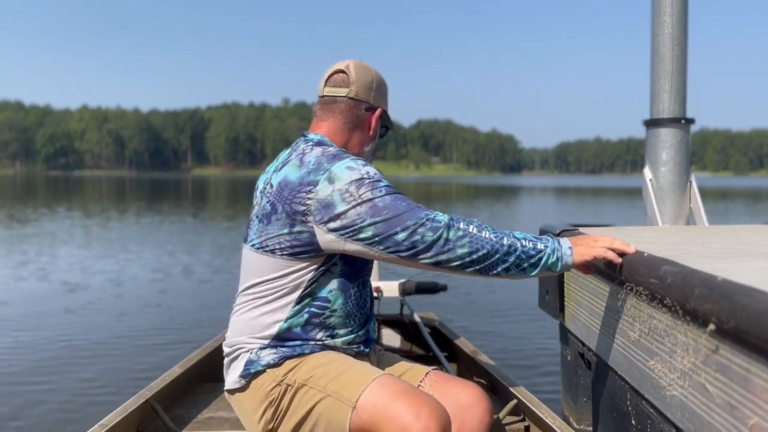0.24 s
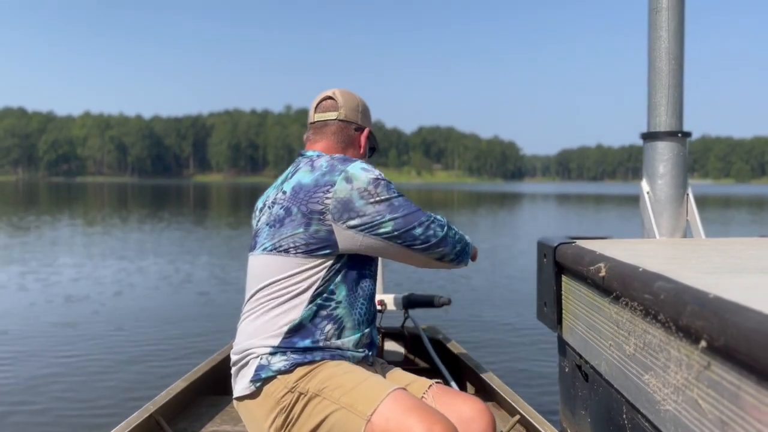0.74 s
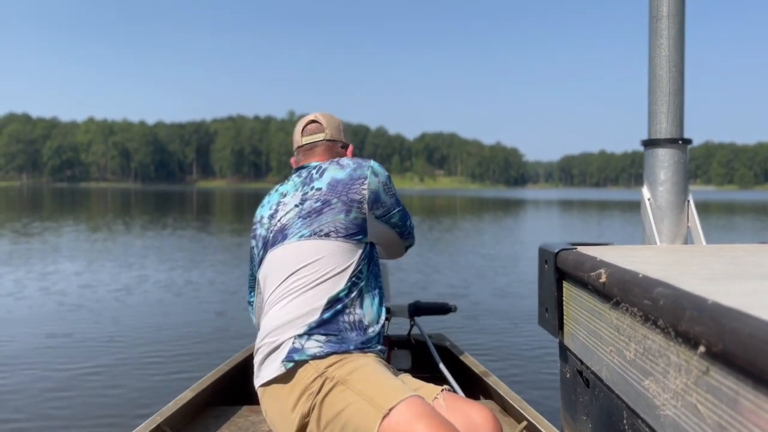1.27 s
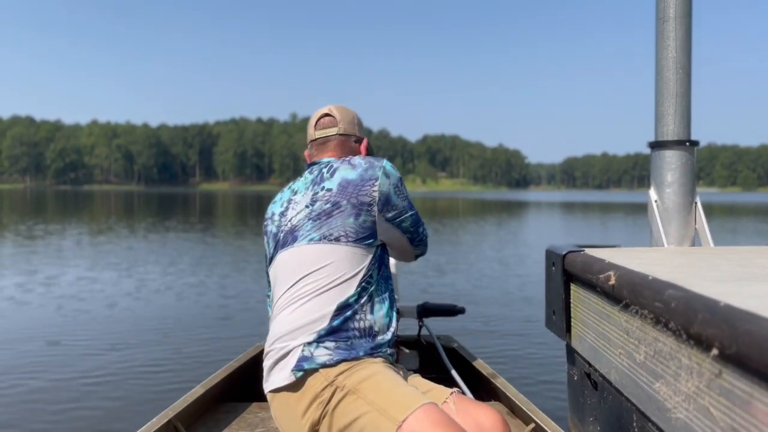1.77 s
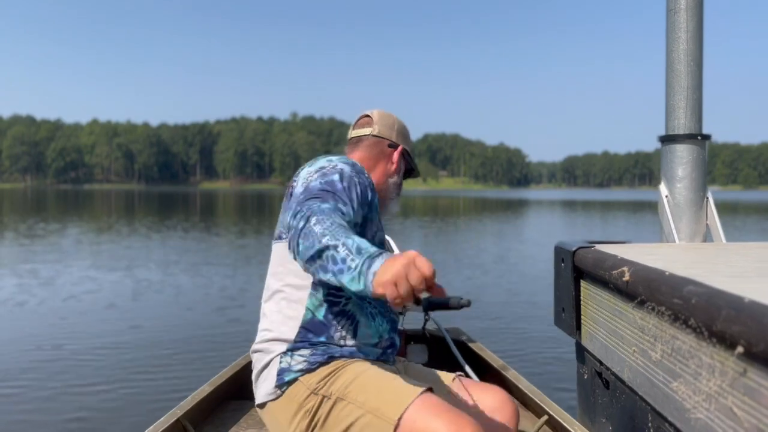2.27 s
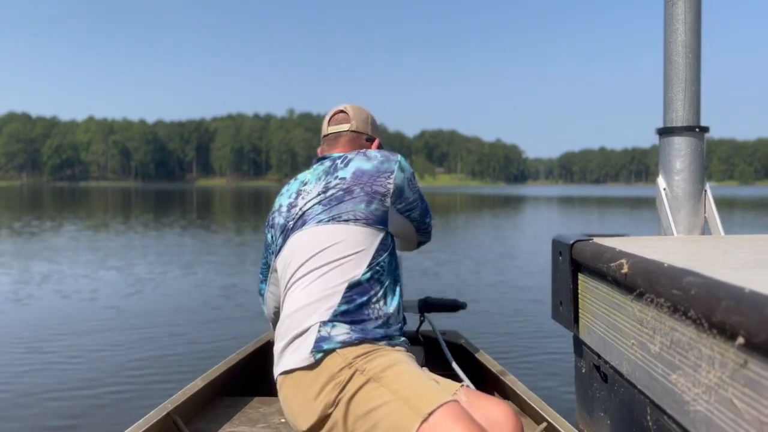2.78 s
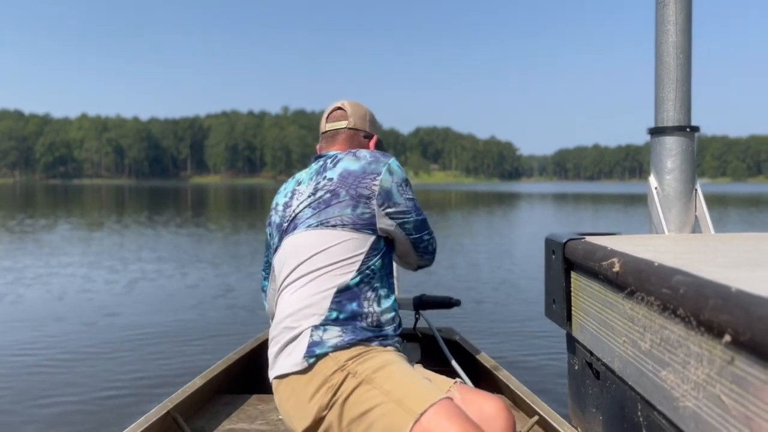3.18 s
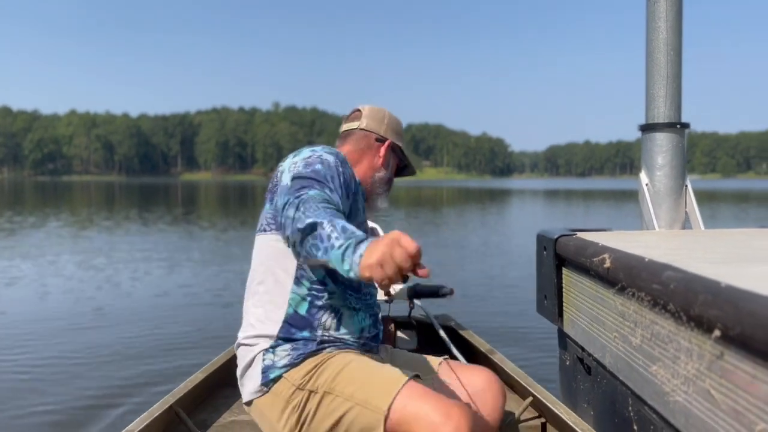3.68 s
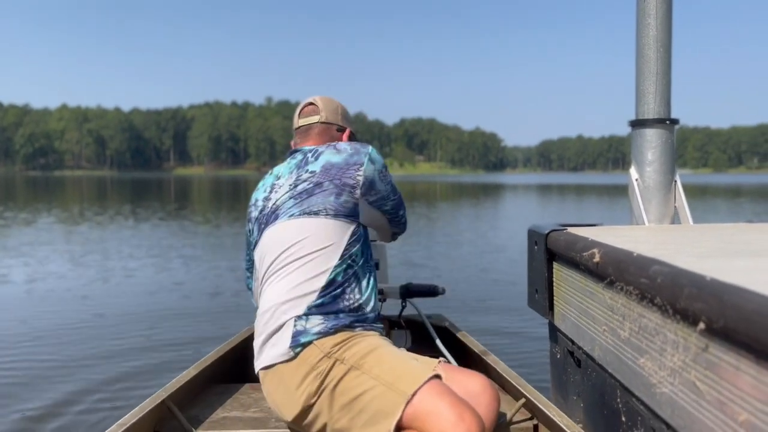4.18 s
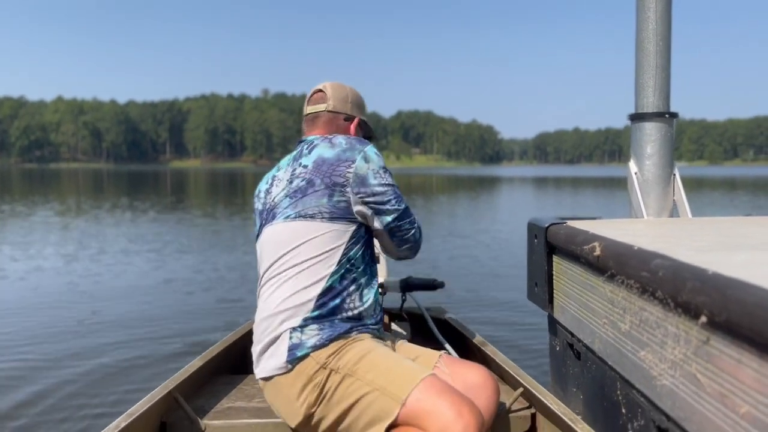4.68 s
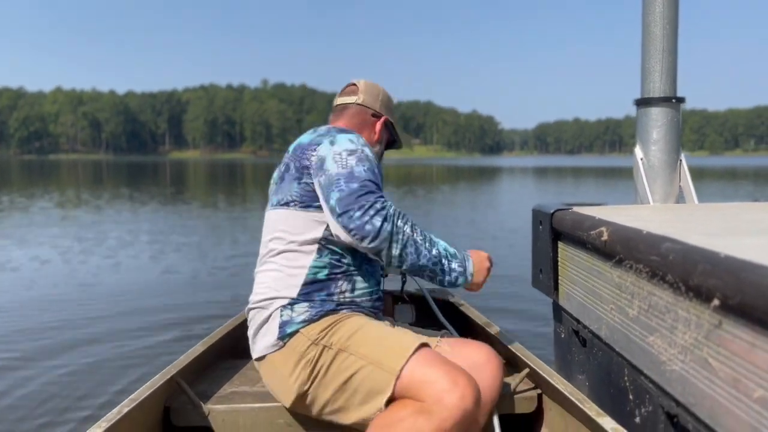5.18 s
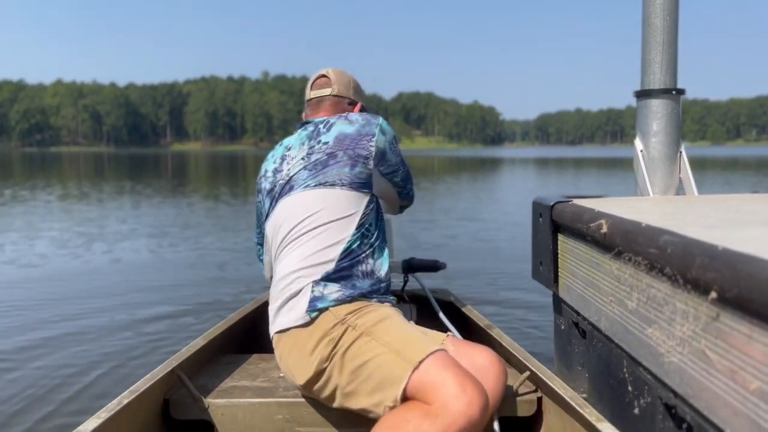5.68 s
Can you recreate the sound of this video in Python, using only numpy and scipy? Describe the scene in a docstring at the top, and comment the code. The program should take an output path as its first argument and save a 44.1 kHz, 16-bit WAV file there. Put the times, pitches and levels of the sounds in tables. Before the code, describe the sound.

On a quiet lake, a small metal boat gives a few soft, hollow bumps as someone shifts in it. Then an outboard motor's starter cord is yanked three times. Each pull brings a brief cord hiss, sharp clacks, a rattling cover and a low drumming through the hull, then dies without the engine starting. One last knock follows, heard in stereo from inside the boat.

```python
"""A quiet lake hisses and faint, high ticks sound. A man shifts in a small aluminium boat, rocking it.
Near 2, 3.4 and 4.8 s he yanks the starter cord of an outboard motor. Each time the cord hisses out,
the turning engine makes the hull drum, and the handle and pawls (the starter's catches) clack on its cover.
After each pull the engine dies; a last knock comes near 5.9 s. A phone in the bow hears it in stereo."""
import sys
import numpy as np
from scipy import signal
from scipy.fft import rfft, irfft
from scipy.io import wavfile
from scipy.ndimage import uniform_filter1d

SR = 44100
rng = np.random.default_rng(int(sys.argv[2]) if len(sys.argv) > 2 else 0)


def wav_out(sig):
    """Save sig, one row per channel (or a flat mono array), as 16-bit PCM at SR to the path in sys.argv[1]."""
    wavfile.write(sys.argv[1], SR, np.round(np.clip(np.atleast_2d(sig).T, -1, 1) * 32767).astype(np.int16))


N = 262218
TIME = np.arange(N) / SR

# Pulls on the cord: (engine starts turning [s], cord runs out [s], strength [dB])
PULLS = [(1.967, 2.12, -2), (3.398, 3.497, 0.5), (4.773, 4.928, -4)]
def pull_level(rest_db, level, rise, delay, hold, fall, blows=(), wake_db=0, wake_fall=0):
    """Loudness in dB of rocking, pulls and fading blows together. Times are in s, slopes in dB/s."""
    power = undb(rest_db) ** 2
    for start, end, strength_db in PULLS:
        power += swell(start + delay, end + hold, level + strength_db, rise, fall)
    for start, blow_db in blows:
        power += (TIME > start) * swell(start, start, blow_db + wake_db, 0, wake_fall)
    return 10 * np.log10(power)


# Notes the hull's panels ring at: (pitch [Hz], width [Hz], level [dB])
HULL_NOTES = [(161.8, 25, 0), (127.7, 15.6, -6), (211.2, 34, -9), (258.3, 27.3, -10)]
# The hull's deep boom: (pitch [Hz], width [Hz], level [dB])
BOOM_NOTES = [(52, 31.5, -0.5), (73, 25.8, 5), (110.8, 11.6, 5), (215.2, 44.4, -4.5), (293, 250, -14.5)]
def hull_shake(rest_db):
    """Uneven jolts from the turning engine make the thin metal hull drum."""
    blows = [(start, db) for start, db, _, _ in THUMPS]
    deep_blows = [(start, db + boom_db) for start, db, boom_db, _ in THUMPS]
    drum_db = pull_level(rest_db, level=-33, rise=92, delay=-0.04, hold=0.18, fall=55,
                         blows=blows, wake_db=-14, wake_fall=92)
    boom_db = pull_level(rest_db, level=-35, rise=160, delay=0.08, hold=0.1341, fall=26.5,
                         blows=deep_blows, wake_db=-5.5, wake_fall=121)
    rubber_mounts = signal.butter(2, 320, fs=SR)  # they soften each jolt
    push = signal.lfilter(*rubber_mounts, jolts(rate=220, scatter_db=1.5))
    push *= undb(2.2 * wander(22))  # the crank strains and lets go
    return undb(drum_db) * unit(ring(push, HULL_NOTES)) + undb(boom_db) * unit(ring(push, BOOM_NOTES))


# Blows on the hull: (time [s], level [dB], boom against the note [dB], shove length [ms])
THUMPS = [(0.123, -52, 2.5, 8.3), (0.175, -61.5, 13.5, 15), (0.838, -34, 5, 6.1), (0.854, -43, -15, 6.7),
          (1.1, -33, 3.5, 4), (1.135, -32.5, -2, 3.8), (1.257, -39, -23, 8.7), (1.41, -25, -32, 8.8),
          (1.523, -46, -30, 48), (1.867, -34.5, -9, 11), (1.89, -31.5, -12, 11), (1.995, -29.5, -7, 15),
          (2.013, -24, -5, 17), (2.042, -17.5, -4, 4.7), (2.153, -17.5, -8, 12.3), (2.262, -22, -37, 16),
          (2.305, -25.5, -16, 16), (2.35, -27, -5, 10), (2.738, -27.5, -10, 39), (2.894, -34, -19, 7.4),
          (2.925, -36.5, -22, 14), (3.043, -23.5, -24, 12.3), (3.327, -36, -34, 5.9),
          (3.41, -32.5, -16, 6.8), (3.497, -23, -25, 21), (3.527, -19.5, -26, 36), (3.574, -21, -28, 26),
          (3.628, -21, -33, 19), (3.659, -25.5, -12, 12), (3.834, -27, -32, 16), (4.059, -32, -31, 20),
          (4.17, -31.5, -38, 48), (4.495, -22, -43, 16), (4.664, -30, -32, 9.4), (4.775, -23, -10, 17),
          (4.806, -21, -10, 12), (4.833, -31, -4, 7.8), (4.869, -28, -16, 17), (4.923, -23, -2.5, 68),
          (4.958, -25.5, -2, 8.6), (5.013, -32, -10, 8.4), (5.024, -22.5, -29, 12.6), (5.055, -32, -18, 18),
          (5.128, -28.5, -13, 25), (5.16, -35, -24, 17), (5.224, -32, 0, 15), (5.306, -42, 7.5, 10),
          (5.489, -47, 6.5, 27), (5.903, -22, -23, 14)]
def hull_thumps():
    """Each blow shakes the hull at its main pitch, so a longer shove swells the note."""
    out, t = np.zeros((2, N)), np.arange(int(0.5 * SR)) / SR
    tap = np.sin(np.pi * np.clip(t / 0.0025, 0, 1))
    boom = ring(tap, BOOM_NOTES)
    boom /= np.abs(boom).max()
    for start, db, boom_db, shove_ms in THUMPS:
        shove = np.sin(np.pi * np.clip(t / (shove_ms / 1000), 0, 1))
        note = ring(shove * np.sin(2 * np.pi * HULL_NOTES[0][0] * t), HULL_NOTES)
        note /= np.abs(note).max()
        add(out[0], start - 0.004, undb(db) * (note + undb(boom_db) * boom))
    return out


# Notes of the boat's back wall, where the motor hangs: (pitch [Hz], width [Hz], level [dB])
BACK_WALL_NOTES = [(247, 70, 0.5), (434, 113, 1.5), (633, 99, -1.5), (761, 210, -6)]
# Lower notes of the engine cover: (pitch [Hz], width [Hz], level [dB])
COVER_NOTES = [(891, 28, 1.5), (971.4, 39, 0.5), (1117, 115, 0), (1335, 230, -3), (1546, 297, -6.5)]
# Higher notes of the cover: (pitch [Hz], width [Hz], level [dB])
COVER_HIGH_NOTES = [(1770, 52, 3), (1964, 43, 5.5), (2020, 51, 5.5), (2379, 54, 4.5), (2617, 52, 3),
                    (2810, 27, 3.5), (3044, 90, 1.5), (3337, 51, 1.5), (3430, 65, 1.5), (3850, 38, -5)]
def engine(rest_db):
    """The flywheel churns through the back wall while loose parts rattle in the cover."""
    blows = [(start, db + hollow_db) for start, db, _, hollow_db, _ in CLACKS]
    churn_db = pull_level(rest_db + 2.5, level=-41.5, rise=105, delay=0.07, hold=0.22, fall=89,
                          blows=blows, wake_db=-14.5, wake_fall=150)
    rattle_db = pull_level(rest_db, level=-47.5, rise=87, delay=0.57, hold=0.3252, fall=95)
    push = jolts(rate=700, scatter_db=3.5) * undb(3.5 * wander(25) + 1.5 * wander(80))
    # now and then a part hits one spot, so one note stands out
    lone_notes = COVER_NOTES[1:] + COVER_HIGH_NOTES[2:5]
    clink = sum(ring(jolts(rate=90, scatter_db=2), [note]) for note in lone_notes)
    rattle = unit(ring(push, COVER_NOTES)) + undb(-8) * unit(ring(push, COVER_HIGH_NOTES))
    rattle += undb(-7.5) * unit(clink)
    return undb(churn_db) * unit(ring(push, BACK_WALL_NOTES)) + undb(rattle_db) * rattle


# Notes of a pawl: (pitch [Hz], width [Hz], level [dB])
PAWL_NOTES = [(4120, 23, 9.5), (4500, 520, 6.5), (5130, 200, 7.5), (5860, 510, 2.5), (8080, 1140, -0.5),
              (9800, 1600, -22)]
# Pawls, handle and fittings hit: (time [s], level [dB], treble [dB], hollow part [dB], rattle time [ms])
CLACKS = [(0.621, -61.5, 5.5, -11, 4), (0.824, -50, -22, 8.5, 12), (0.828, -55, -19, 14, 68),
          (0.874, -46, -32, 2.5, 93), (1.026, -60.5, 5, -10, 4.4), (1.083, -47, -20, -5, 10),
          (1.084, -41.5, -27, 6, 68), (1.122, -56, -25, 13, 72), (1.12, -61, 7, -10, 7),
          (1.231, -51, 3.5, 3, 10), (1.331, -59.5, 6.5, -10, 8), (1.388, -35.5, -25, -1, 24),
          (1.859, -40, -33, 5.5, 90), (1.923, -35, 3.5, 0.5, 5.2), (2.022, -28, -9, -1.5, 5.1),
          (2.133, -18, -2.5, -8, 24), (2.241, -37.5, -2, 7, 7.4), (2.329, -48, 3, 7, 20),
          (2.452, -45, -8, -7, 16), (2.696, -52, 0, -14, 14), (2.722, -31.5, 0, -13.5, 16),
          (2.854, -47.5, -7.5, -26, 5), (2.904, -46, -6, -0.5, 25), (3.032, -35.5, -10, 2.5, 14.7),
          (3.192, -44.5, -31, 1.5, 44), (3.521, -28, -16, -3, 4.5), (3.555, -20, -2, -15, 29.6),
          (3.65, -44, 2, -10, 4.5), (3.663, -30, -5, 2.5, 21), (3.679, -35, -20, 12, 8.9),
          (3.74, -33, -31, -2, 27), (3.769, -45.5, 1, -3, 52), (3.836, -47, -9, 15, 17),
          (3.89, -37.5, -16, -3.5, 30), (4.42, -47.5, -7.5, -24, 86), (4.481, -32.5, -8.5, -2, 16),
          (4.745, -35, -7.5, -19, 91), (4.774, -34, -38, 7.5, 30), (4.848, -30, -26, -16, 50),
          (4.877, -38, -12, -23, 5.4), (4.916, -16.5, -4.5, -9, 25.6), (5.008, -41.5, 3, 9, 6.5),
          (5.082, -40, -2.5, -21, 20), (5.156, -47.5, 4, -11, 10), (5.24, -44.5, -8, -7, 41),
          (5.284, -52.5, -0.5, -6, 95), (5.797, -45.5, -5, -0.5, 26), (5.884, -30.5, -12.5, 4.5, 16.2)]
def clacks():
    """Each clack is a burst of tiny hits: a bright crack, then the cover and back wall ring."""
    out, t = np.zeros((2, N)), np.arange(int(0.2 * SR)) / SR
    damping = 1.8  # parts stay touching, which shortens the ring
    tail = 0.26 * np.exp(-t / 0.025)
    spots = rng.standard_normal((len(CLACKS), 2, 16))
    for (start, db, treble_db, hollow_db, rattle_ms), spot in zip(CLACKS, spots):
        rattle_s = rattle_ms / 1000
        swell_s = 0.012 * undb(0.2 * treble_db)  # dull knocks swell faster
        noise, roughness = rng.standard_normal((2, 2, len(t)))
        hits = noise * undb(4.3 * roughness)
        body = hits * (1 - np.exp(-t / swell_s)) * (np.exp(-(t / rattle_s) ** 2) + tail)
        crack = hits * np.clip(t / 0.000077, 0, 1) * (np.exp(-(t / (0.87 * rattle_s)) ** 1.32) + tail)
        tick = crack * (0.72 + 0.36 * np.exp(-t / 0.014))
        parts = [(body, COVER_NOTES, -3.5), (body, BACK_WALL_NOTES, hollow_db),
                 (crack, COVER_HIGH_NOTES, treble_db), (tick, PAWL_NOTES, treble_db - 1.5)]
        for push, notes, part_db in parts:
            # each blow lands somewhere new, so the notes shift in pitch and strength
            struck = [(hz * (1 + 0.012 * detune), width * damping, note_db + 2.5 * boost)
                      for (hz, width, note_db), detune, boost in zip(notes, *spot)]
            sound = ring(push, struck)
            add(out, start, undb(db + part_db) * sound / np.abs(sound[0]).max())
    return out


# Loose parts hit one spot: (loudest moment [s], pitch [Hz], level [dB], rough length [ms])
CLINKS = [(0.765, 417, -55, 24), (0.795, 350, -55, 26), (0.847, 301, -34, 17.2), (0.875, 328, -50, 23),
          (0.895, 1195, -50, 34), (0.919, 1120, -52, 23), (0.948, 1256, -60, 44), (1.104, 350, -46, 17.6),
          (1.11, 910, -52, 43), (1.137, 302, -43, 18), (1.234, 1294, -53, 12), (1.396, 990, -34.5, 14),
          (1.87, 865, -47.5, 36), (1.927, 1120, -36, 19), (2.011, 440, -34, 18.4), (2.025, 906, -29.5, 12),
          (2.044, 451, -34, 23.4), (2.145, 1004, -19, 11), (2.161, 430, -37, 28), (2.243, 2310, -39.5, 12),
          (2.352, 1760, -51, 13.6), (2.458, 947, -42.5, 16), (2.559, 1230, -62, 25), (2.729, 2110, -33, 12),
          (2.861, 1990, -52, 16), (2.862, 2440, -54, 11), (2.864, 1050, -52, 11), (2.919, 1020, -53, 35),
          (2.957, 1070, -58, 32), (2.985, 1950, -62, 36), (2.992, 960, -57, 24), (3.041, 1044, -41, 11),
          (3.048, 398, -42, 15), (3.209, 934, -49, 40), (3.228, 1490, -57, 26), (3.25, 726, -48, 32),
          (3.385, 930, -43, 20), (3.389, 1220, -56, 15), (3.567, 1010, -28, 16), (3.573, 1497, -25, 12.6),
          (3.675, 1173, -37.5, 24), (3.677, 229, -29, 17), (3.687, 200, -20.5, 12.4),
          (3.712, 1150, -39, 19), (3.744, 2360, -53, 33), (3.751, 990, -35.5, 11), (3.897, 965, -42.5, 60),
          (3.911, 2400, -55, 29), (3.979, 950, -53, 46), (3.997, 1350, -55, 24), (4.128, 1000, -60, 14),
          (4.253, 2000, -64, 16), (4.433, 1000, -49.5, 11), (4.452, 1000, -61, 17), (4.453, 2530, -62, 16),
          (4.492, 965, -38.5, 16), (4.642, 927, -55, 29), (4.748, 1130, -47, 17), (4.781, 1380, -39.5, 18),
          (4.883, 1110, -35.5, 20), (4.929, 1071, -19.5, 16), (4.936, 2550, -33, 28),
          (5.083, 2330, -44, 15), (5.09, 1120, -42, 35), (5.128, 945, -47, 14), (5.162, 1800, -58, 26),
          (5.245, 950, -41, 10.6), (5.274, 2040, -53, 47), (5.285, 970, -44.5, 10.3), (5.301, 965, -50, 10),
          (5.479, 1060, -55, 12), (5.811, 924, -46.5, 11.7), (5.899, 500, -46, 13), (5.901, 894, -35, 23.5)]
def clinks():
    """A struck part rings on one wavering note that swells fast and fades more slowly."""
    out = np.zeros((2, N))
    for (peak_time, hz, db, length_ms), offset in zip(CLINKS, rng.random((len(CLINKS), 2))):
        rise_s = 0.3 * length_ms / 1000
        t = np.arange(int(8 * rise_s * SR)) / SR
        waver = 14 * uniform_filter1d(rng.standard_normal(len(t)), size=200)
        cycles = np.cumsum(hz * (1 + 0.012 * waver)) / SR + offset[:, None]
        shape = (t / rise_s * np.exp(1 - t / rise_s)) ** 2
        add(out, peak_time - rise_s, undb(db) * shape * np.sin(2 * np.pi * cycles))
    return out


# Metallic snaps: (time [s], level [dB], fade time [ms])
SNAPS = [(1.9227, -26, 9.2), (2.1325, -38, 6), (3.5569, -31, 10), (3.6236, -39, 7.8), (3.6674, -37, 7),
         (4.8599, -41, 8), (4.9163, -35, 6), (5.2967, -47, 7.1)]
# Tone of a snap: (frequency [Hz], level [dB])
SNAP_TONE = [(3000, -12), (5000, 4), (8000, 2.5), (12000, -2), (15700, -3)]
def pawl_snaps():
    """A pawl bites or lets go with a sudden, bright crackle."""
    out, t = np.zeros((2, N)), np.arange(int(0.08 * SR)) / SR
    for start, db, fade_ms in SNAPS:
        noise, roughness = rng.standard_normal((2, 2, len(t)))
        crackle = noise * undb(2.5 * roughness)
        add(out, start, undb(db - 3.5) * crackle * np.exp(-t / (fade_ms / 1000)))
    return colour(out, SNAP_TONE)


# Runs of the cord: (start [s], length [s], level above 9.5 kHz [dB])
CORD_RUNS = [(1.932, 0.015, -48), (1.954, 0.011, -48), (2.026, 0.1, -53.5), (2.406, 0.022, -65),
             (3.338, 0.045, -51), (3.392, 0.036, -44), (3.455, 0.075, -51.5), (3.655, 0.0063, -50.5),
             (4.825, 0.044, -60.5), (4.916, 0.0082, -51.5), (5.124, 0.015, -65.5), (5.29, 0.01, -72)]
# Tone of the cord: (frequency [Hz], level [dB])
CORD_TONE = [(300, -28), (1000, -3), (2000, -9.5), (3300, -10), (6000, -15.5), (8500, -14.5),
             (11000, -17.5), (14000, -19), (15700, -22.5)]
def cord_hiss():
    """The cord rubs through its guide in short bursts."""
    power = sum(swell(start, start + length, db, rise=377, fall=301) for start, length, db in CORD_RUNS)
    return np.sqrt(power) * rubbing(CORD_TONE, flutter_db=1.1)


# The man's movements: (time [s], hull level [dB], engine level [dB], cloth above 9.5 kHz [dB])
ROCKING = [(0, -72, -74.5, -74.5), (0.5, -89, -83.5, -78.5), (0.62, -73.5, -82, -73),
           (0.74, -59.5, -67.5, -65.5), (0.88, -50, -58, -74), (1.04, -56.5, -80, -68.5),
           (1.32, -53, -62.5, -70.5), (1.5, -45.5, -78, -77.5), (1.69, -60, -92, -77.5),
           (1.751, -68, -63.5, -66.5), (1.85, -64, -59.5, -62), (2.3, -33.5, -50.5, -62),
           (2.6, -46, -89, -71.5), (2.75, -64, -94, -68), (2.998, -49.5, -61.5, -70.5),
           (3.15, -59, -101, -64.5), (3.28, -60, -61, -73.5), (3.95, -43.5, -64.5, -65),
           (4.2, -55.5, -67.5, -71), (4.3, -67, -92, -70.5), (4.45, -57.5, -94, -74),
           (4.62, -47, -63.5, -72.5), (4.72, -54, -51, -66.5), (5.2, -46, -54.5, -67.5),
           (5.38, -50, -76, -76.5), (5.6, -48.5, -66, -74), (5.76, -59, -81.5, -79.5),
           (5.85, -53, -57.5, -64)]
def rocking_levels():
    """The man shifts and the boat rocks: loudness curves for the hull, the engine and his clothes."""
    times, *columns = np.transpose(ROCKING)
    return [np.interp(TIME, times, column) for column in columns]


# Tone of rustling cloth: (frequency [Hz], level [dB])
CLOTH_TONE = [(300, -22), (1000, -17), (1600, -16.5), (2800, -13), (6000, -13.5), (8500, -19.5),
              (11000, -19), (14000, -18.5), (15700, -21.5)]
def sleeve_rustle(level_db):
    """His sleeve rubs on his shirt."""
    return undb(level_db) * rubbing(CLOTH_TONE, flutter_db=2.5)


# Drips and squeaks: (time [s], length [s], first pitch [Hz], last pitch [Hz], level [dB])
DRIPS = [(0.698, 0.14, 1420, 1457, -62), (4.159, 0.038, 840, 884, -54), (4.205, 0.043, 850, 1230, -60),
         (4.326, 0.053, 1090, 1080, -65.5)]
def drips_and_squeaks():
    """Drips beside the hull and small squeaks make short, hoarse, sliding tones."""
    out = np.zeros((2, N))
    for start, length, first_hz, last_hz, db in DRIPS:
        progress = np.arange(int(length * SR)) / (length * SR)
        hoarse = 12 * uniform_filter1d(rng.standard_normal(len(progress)), size=150)
        hz = (first_hz + (last_hz - first_hz) * progress) * (1 + 0.03 * hoarse)
        shape = undb(db + 1.1 * hoarse) * np.sin(np.pi * np.sqrt(progress))
        add(out[0], start, shape * np.sin(2 * np.pi * np.cumsum(hz) / SR))
    return out


# Thin, high ticks: (time [s], level [dB])
TICKS = [(0.065, -58), (0.1411, -59), (0.2124, -58), (0.2872, -58), (0.3745, -62), (0.4369, -59),
         (0.4958, -57), (0.5616, -62), (0.624, -57), (0.8101, -52), (0.8355, -56), (0.9088, -54),
         (1.0101, -53), (1.0296, -52), (1.1977, -58), (1.4651, -59), (1.5204, -57), (1.5683, -59),
         (1.5873, -58), (1.6536, -57), (1.7529, -67), (3.9749, -55), (4.0292, -52), (4.4408, -65),
         (4.6463, -73), (5.5682, -67)]
def high_ticks():
    """Perhaps an insect: each tick is a tiny burst of noise at its own high pitch."""
    out, t = np.zeros((2, N)), np.arange(int(0.04 * SR)) / SR
    shape = (1 - np.exp(-t / 0.00088)) * np.exp(-t / 0.0067)
    for (start, db), hz in zip(TICKS, rng.uniform(11600, 13800, len(TICKS))):
        band = [(hz, 6200, 0)]
        noise = rng.standard_normal((2, len(t)))
        add(out, start, undb(db - 4) * shape * unit(ring(ring(noise, band), band)))
    return out


# Tone of the lake: (frequency [Hz], level [dB])
LAKE_TONE = [(20, -55.5), (40, -23.5), (70, 8.5), (150, -8), (300, -31.5), (800, -38.5), (1500, -38.5),
             (2200, -29), (2700, -24.5), (5500, -25), (6200, -27.5), (7600, -17.5), (8500, -33),
             (10000, -30.5), (14000, -44.5), (15700, -51)]
# Slow drift of its loudness: (time [s], change [dB])
LAKE_DRIFT = [(0.05, 1), (0.45, -1.5), (0.75, 1), (1.65, 0.5), (3.05, 0.5), (4.35, 2), (5.1, 5), (5.9, 3)]
def lake():
    """Air moves over the boat and the far shore hisses."""
    drift_db = np.interp(TIME, *np.transpose(LAKE_DRIFT)) + 1.2 * wander(9)
    return undb(-62 + drift_db) * unit(colour(rng.standard_normal((2, N)), LAKE_TONE))


def undb(db):
    """Turn decibels into a volume factor."""
    return 10 ** (np.asarray(db) / 20)


def unit(x):
    """Scale a sound to an average power of 1."""
    return x / np.sqrt(np.mean(x ** 2))


def along(table):
    """Join a table's (frequency, value) points into a curve over all frequencies."""
    hz, value = np.transpose(table)
    return np.interp(np.log(np.fft.rfftfreq(N, 1 / SR) + 1), np.log(hz + 1), value)


def colour(x, tone):
    """Turn each frequency up or down as the tone table says."""
    return irfft(rfft(x) * undb(along(tone)), N)


def ring(push, notes):
    """Let a push ring a set of notes, neighbours in opposite sign. Wider notes fade sooner."""
    return sum((-1) ** k * undb(db) * signal.lfilter(*signal.iirpeak(hz, hz / width, SR), push)
               for k, (hz, width, db) in enumerate(notes))


def add(out, start, sound):
    """Mix a sound in at a start time in seconds."""
    i = int(start * SR)
    out[..., i:i + sound.shape[-1]] += sound[..., :N - i]


def wander(rate):
    """Slide to a new random value, rate times a second."""
    step = int(SR / rate)
    return uniform_filter1d(np.repeat(rng.standard_normal(N // step + 1), step), step)[:N]


def jolts(rate, scatter_db):
    """Two rows of random kicks, about rate a second, most small and a few large."""
    chance, direction, strength = rng.random((3, 2, N))
    size = np.minimum(-np.log(1 - strength), 4)
    return (chance < rate / SR) * np.sign(direction - 0.5) * undb(scatter_db * size)


def swell(start, end, db, rise, fall):
    """Power that climbs to db, holds from start to end, then fades. Slopes are in dB/s."""
    early, late = np.maximum(start - TIME, 0), np.maximum(TIME - end, 0)
    return undb(db - rise * early - fall * late) ** 2


def rubbing(tone, flutter_db):
    """Fluttering noise, scaled by the strength of its part above 9.5 kHz."""
    noise = rng.standard_normal((2, N))
    rub = colour(noise * undb(flutter_db * wander(45) + 1.5 * wander(300)), tone)
    top = signal.sosfilt(signal.butter(4, 9500, "high", fs=SR, output="sos"), rub)
    return rub / np.sqrt(np.mean(top ** 2))


# Share of the sound that differs between left and right: (frequency [Hz], level [dB])
SCATTER_TONE = [(60, -26), (150, -16.5), (260, -5.5), (550, -4.5), (1000, -4), (5000, -4), (8000, -22),
                (15000, -28)]
def scene():
    """Mix the sources: row one arrives directly, row two is scattered by seats, sides and dock."""
    hull_db, engine_db, cloth_db = rocking_levels()
    mix = hull_shake(hull_db) + hull_thumps() + engine(engine_db)
    mix += cord_hiss() + sleeve_rustle(cloth_db) + lake()
    mix += clacks() + clinks() + pawl_snaps() + drips_and_squeaks() + high_ticks()
    direct, scattered = mix[0], colour(mix[1], SCATTER_TONE)
    return np.array([direct + scattered, direct - scattered])


# Phase difference between the sides, stepped in the treble: (frequency [Hz], left minus right [rad])
STEREO_PHASE = [(0, 0), (350, 0), (700, -.45), (1300, 0), (2000, -.2), (2800, .8), (5100, .8), (5700, -1.3),
                (6600, -1), (8000, -3), (9100, -3.3), (10700, -6.1), (13000, -6.4), (14800, -9.3),
                (16000, -9.5)]
# How much louder the left side is: (frequency [Hz], left minus right [dB])
STEREO_BALANCE = [(100, .5), (400, 0.5), (560, 0), (800, -3), (1050, -1.8), (1400, -1), (2100, 1),
                  (4500, 5.5), (5600, 4), (8000, 0), (15000, 0)]
def record(dry):
    """Left and right differ in phase and level, spreading the sound; deep bass and top treble are cut."""
    left = np.exp(0.5j * along(STEREO_PHASE)) * undb(along(STEREO_BALANCE) / 2)
    heard = irfft(rfft(dry) * np.array([left, 1 / left]), N)
    heard = signal.sosfilt(signal.butter(2, 42, "high", fs=SR, output="sos"), heard)
    return signal.sosfilt(signal.ellip(8, 0.2, 70, 15750, fs=SR, output="sos"), heard)


dry = scene()
out = record(dry)
wav_out(out)
```